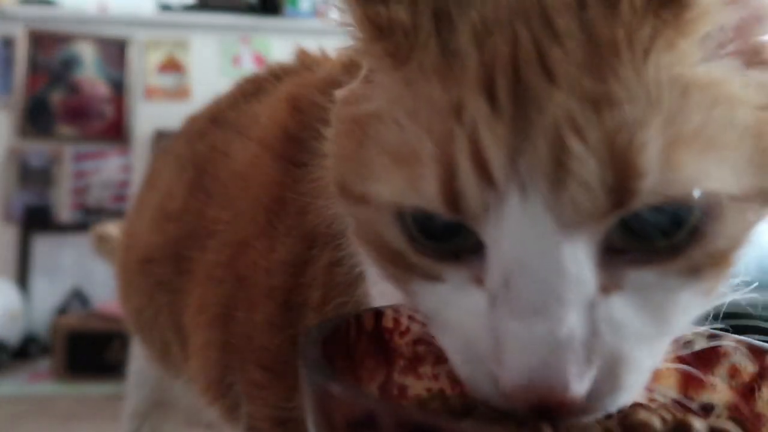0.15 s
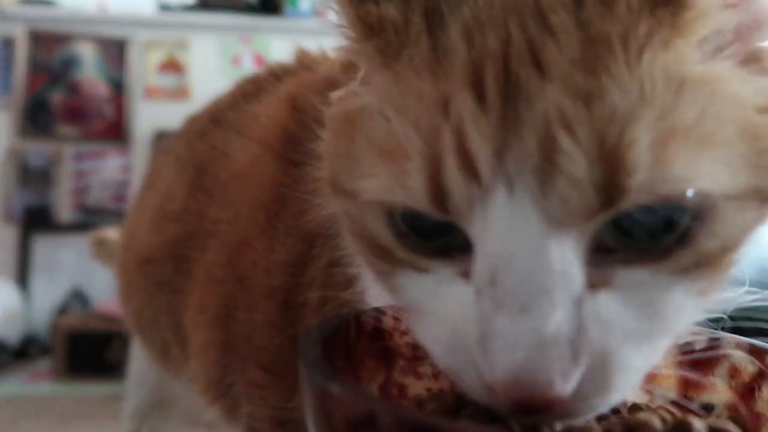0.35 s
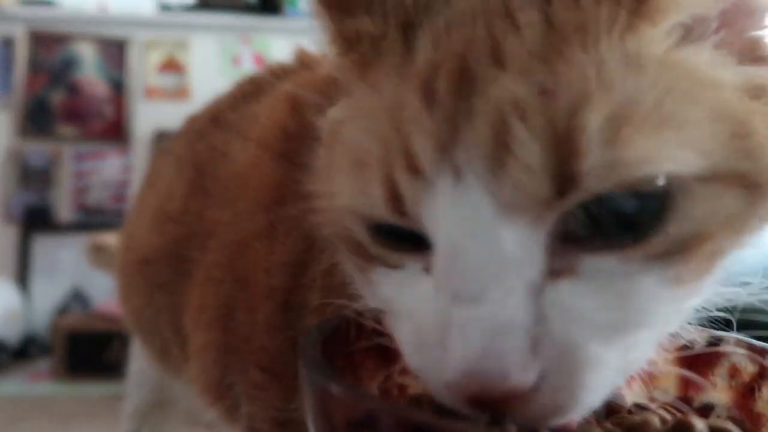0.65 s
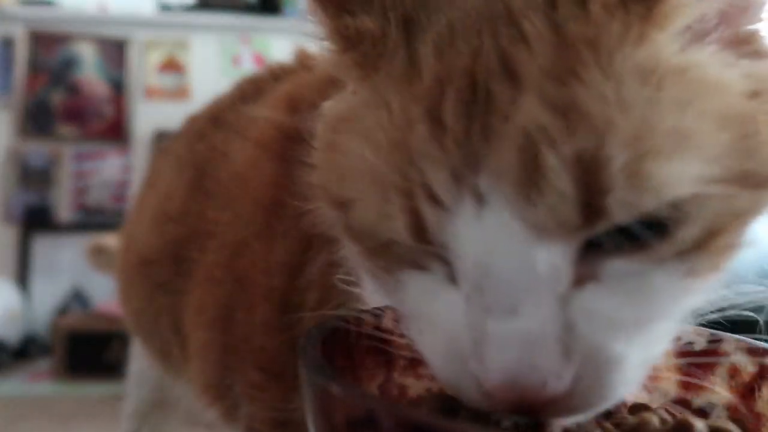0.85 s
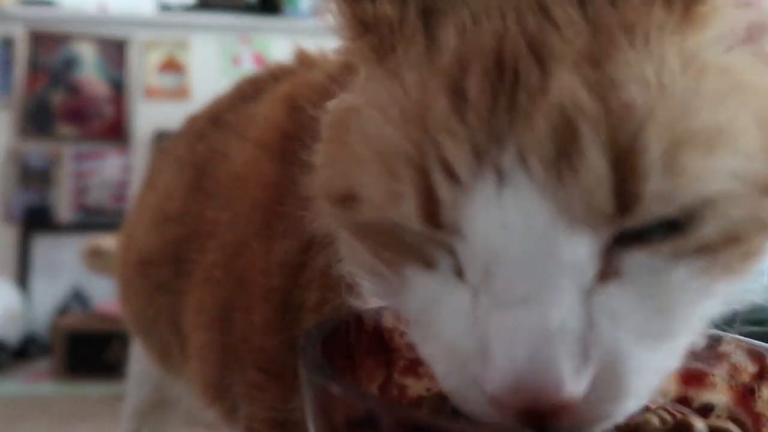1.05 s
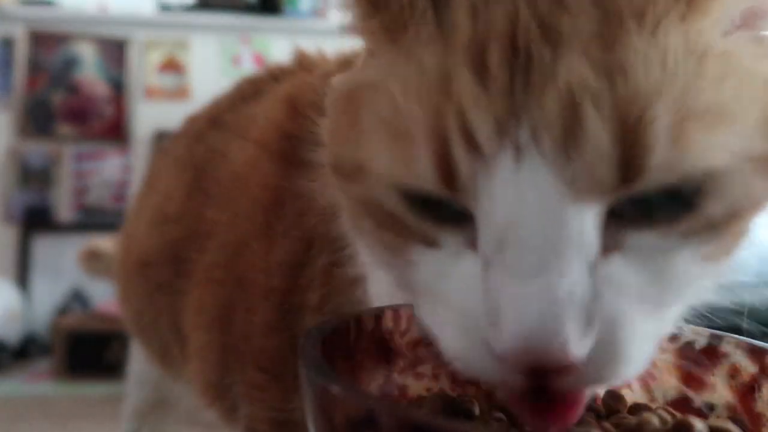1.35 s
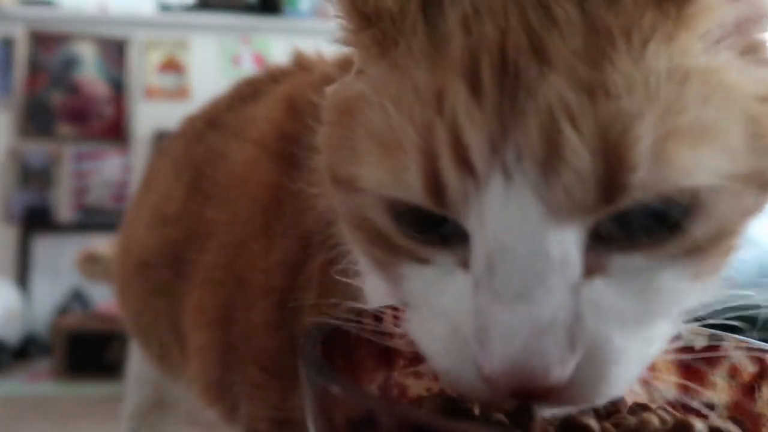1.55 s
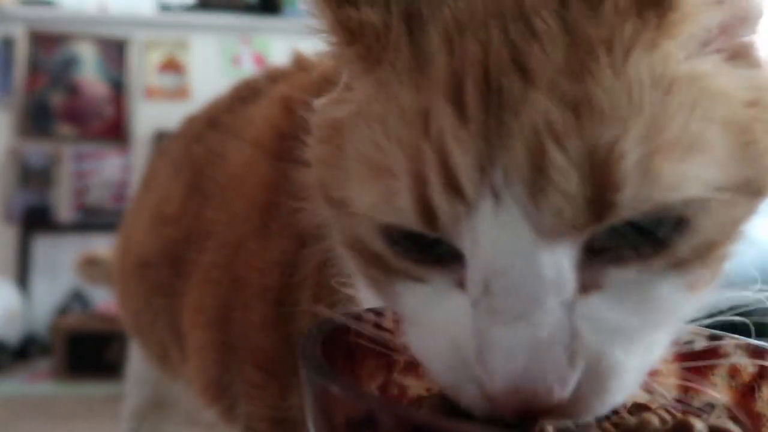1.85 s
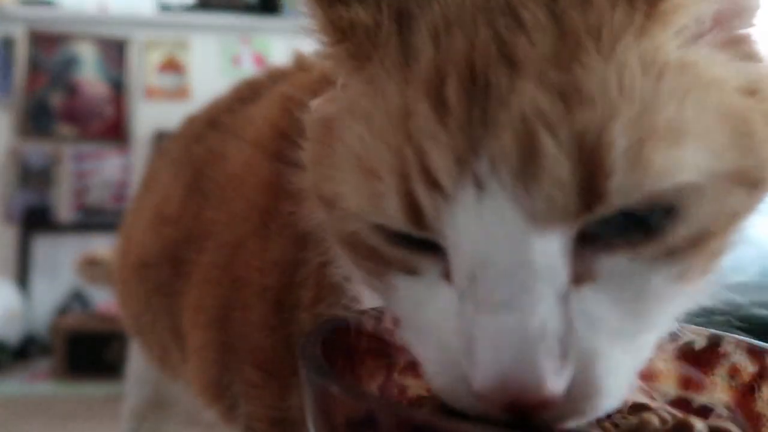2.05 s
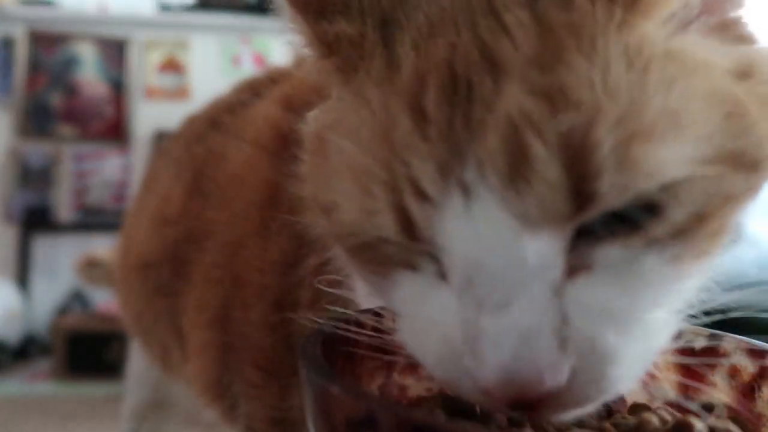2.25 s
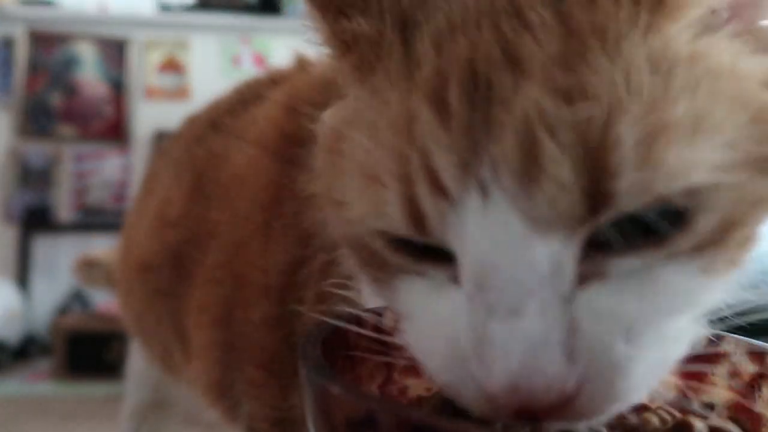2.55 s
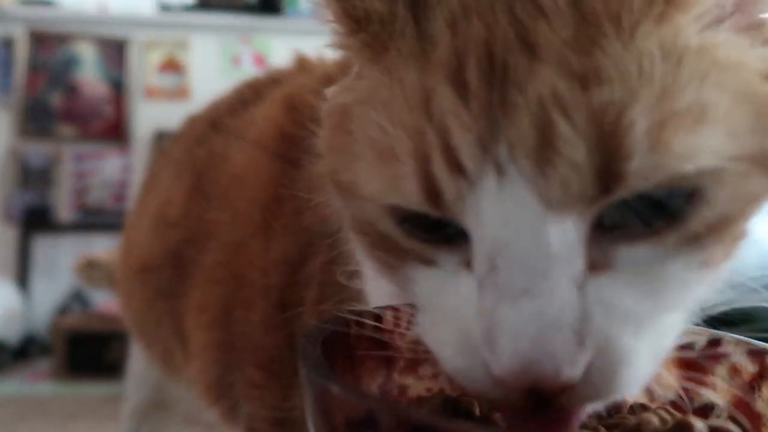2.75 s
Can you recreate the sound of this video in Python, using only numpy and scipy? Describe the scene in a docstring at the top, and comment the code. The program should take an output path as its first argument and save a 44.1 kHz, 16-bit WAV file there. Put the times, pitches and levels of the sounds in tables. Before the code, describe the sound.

A cat crunches dry food a hand's width from two microphones in a quiet furnished room; light nibbles first, then dense loud cracks with crumbling, low dish thuds and two faint wet smacks.

```python
"""Cat crunching dry food

A cat crunches dry food over its dish, a hand's width from two microphones in a quiet furnished room.
Each bite cracks a pellet: a burst of snaps, then a dying shower of tiny fractures, excites short resonances.
Jaw and nose jolt the dish, whose modes thud and rumble; the tongue smacks twice through mouth resonances.
Steady room tone and diffuse reflections surround these sources.
"""
import sys
import numpy as np
from scipy import signal
from scipy.fft import rfft, irfft
from scipy.io import wavfile

SR = 44100
rng = np.random.default_rng(int(sys.argv[2]) if len(sys.argv) > 2 else 0)


def makeup_ratio(level_db):
    """Linear amplitude ratio for a level in decibels (20 dB per factor of ten)."""
    decades = np.asarray(level_db, float) / 20
    return 10 ** decades


def master(y):
    """Save y as 16-bit WAV."""
    cut = np.clip(np.atleast_2d(y).T, -1, 1)
    pcm = np.round(cut * 32767)  # scale
    wavfile.write(sys.argv[1], SR, pcm.astype(np.int16))


N = 127890


def at_hz(points, hz):
    """Spectral interpolation: values between the points are linear in log frequency."""
    table = np.array(points)
    return np.interp(np.log(hz), np.log(table[:, 0] + 1), table[:, 1])


def ring(clicks, hz, t60):
    """Impulse response of a damped oscillator: a unit click starts a dying sine of about unit height."""
    r, w = makeup_ratio(-60 / (t60 * SR)), 2 * np.pi * hz / SR
    return signal.lfilter([0, np.sin(w)], [1, -2 * r * np.cos(w), r * r], clicks + 1e-18)


def dying(s, t60, at):
    """Exponential decay, events x samples `at`: zero before each start, then an even fall in dB."""
    age = at / SR - s[:, None]
    return (age > 0) * makeup_ratio(-60 * np.clip(age, 0, 3) / t60)


def shower(per_s, spread_db):
    """Poisson-like process: clicks at random moments (samples), of random size and sign."""
    chance, size, sign = rng.random(N), rng.exponential(1, N), rng.choice([-1, 1], N)
    at = np.flatnonzero(chance < per_s / SR)
    sizes = makeup_ratio(spread_db * np.minimum(size, 4)) * sign
    return at, sizes[at] / np.sqrt(np.mean(sizes ** 2))


# relative spectral density of the room tone: f/Hz, level/dB
AIR_COLOUR = [(25, -9.5), (148, 1.5), (593, -15), (1980, -21.5), (12000, -37)]
# correlation of left and right in the room tone: f/Hz, correlation/1
AIR_LIKENESS = [(60, 1), (950, 0.51), (15000, -0.16)]
AIR_DB = -46.5   # rms level


def air():
    """Partially coherent noise field: steady room tone, alike in both channels only in the bass."""
    hz = np.arange(N // 2 + 1) * SR / N + 1
    mid, side = rfft(rng.standard_normal((2, N)))
    alike = np.clip(at_hz(AIR_LIKENESS, hz), -1, 1)
    pair = np.sqrt(1 + alike) * mid + np.sqrt(1 - alike) * side * [[1], [-1]]
    out = irfft(makeup_ratio(at_hz(AIR_COLOUR, hz)) * pair, N)
    return makeup_ratio(AIR_DB) * out / out.std()


# pellets crack: t/s, relative level/dB, treble (counted from the median)/dB, crumbling against crack/dB
CRACKS = [(0.054, -37, -42, -4.5), (0.253, -25.5, -22.5, 0), (0.306, -25.5, -37, -4.5),
          (0.444, -23.5, -30, -7.5), (0.522, -23, -40, -0.5), (0.566, -57, 29.5, 2),
          (0.651, -32, -17.5, 5.5), (0.799, -12.5, -24.5, 0), (0.885, -19.5, -22.5, -2),
          (1.01, -32.5, -36, 8.5), (1.033, -22.5, -12, -0.5), (1.053, -20, -30, 3.5), (1.0834, -6, -9, -42),
          (1.0915, -9, -24.5, -2), (1.135, -9.5, -35, -3.5), (1.144, -15, -37, -16), (1.168, -15, -24, 0),
          (1.246, -5.5, -18, -8.5), (1.254, -12, -14.5, -10), (1.343, -11.5, -15.5, -6.5),
          (1.367, -14.5, -18, 2.5), (1.465, -42, -18.5, 18.5), (1.484, -8, -16, -3), (1.502, -23, -17, -5),
          (1.563, -22, -21, -10), (1.576, -10.5, -22.5, -5.5), (1.626, -14, -18, -7),
          (1.75, -17, -14.5, -12), (1.801, -9.5, -25, -9), (1.823, -13, -23, -1.5),
          (1.9274, -4.5, -20, -12.5), (1.9351, -16.5, -28, -26), (2.034, -29.5, -23, 2.5),
          (2.054, -23, -26, 6.5), (2.257, -12.5, -28, -43), (2.322, -25.5, -23, 0.5),
          (2.3837, -18.5, -12.5, -3.5), (2.4187, -11, -14, -1), (2.474, -22.5, -33, 12.5),
          (2.5502, -12.5, -27.5, 1), (2.57, -13, -19, 3), (2.616, -13, -19, -4), (2.675, -18.5, -31, -1),
          (2.703, -18, -30, -29), (2.75, -19.5, -24, -15.5)]
# colour of a fracture, before a rise in proportion to frequency: f/Hz, level/dB
PELLET_COLOUR = [(290, -30), (500, -6), (838, -2.5), (2040, -0.5), (3990, -12), (8710, -23), (14000, -19)]
TREBLE_FROM_HZ = 3160
CRACK_DB, CRACK_SCATTER_DB = -11, 4.5   # scatter over the resonances
CRACK_S = 0.0011   # time constant of the exponential that ends a crack's swell
CRUMBLE_DB, CRUMBLE_T60_S, TREBLE_DIES_FASTER = -10.5, 0.2, 0.27   # T60 at 2 kHz; power of pitch
FRACTURES_PER_S, FRACTURE_SPREAD_DB = 2200, 2.1
FRACTURE_OCTAVES = 0.97   # a fracture rings the resonances this near its own pitch
PATCHY_DB = 3   # each resonance swells and fades as the crumbs change size
SPAN = 600   # samples: longest crack, and the pace at which crumbs change size
RING_CYCLES = 15.65   # cycles in which a resonance falls by 60 dB


def pellets():
    """Brittle fracture: bursts of snaps, then showers of clicks, excite short resonances of many pitches."""
    s, db, treble_db, crumble_db = np.transpose(CRACKS)
    treble_db = treble_db - np.median(treble_db)
    at, sizes = shower(FRACTURES_PER_S, FRACTURE_SPREAD_DB)
    lag = np.arange(SPAN)
    splinters = (rng.random((len(s), SPAN)) < .15) | (lag < 10)
    swell = (lag + 10) * np.exp(-lag / (CRACK_S * SR))
    crack_at = (s * SR).astype(int)[:, None] + lag
    pitches = np.geomspace(450, 12500, 30)
    own_hz = pitches[rng.integers(0, 30, N)]
    scatter, out = rng.standard_normal((len(s), 30)), 0
    for k, hz in enumerate(pitches):
        gain = makeup_ratio(db + treble_db / (1 + (TREBLE_FROM_HZ / hz) ** 4))
        clicks = np.zeros(N + SPAN)

        # crumbling: the powers of all dying showers add
        fade = dying(s, CRUMBLE_T60_S * (2000 / hz) ** TREBLE_DIES_FASTER, at) ** 2
        crumble = np.sqrt((gain * makeup_ratio(crumble_db)) ** 2 @ fade)
        nearness = np.exp(-(np.log2(hz / own_hz) / FRACTURE_OCTAVES) ** 2)
        strength = rng.standard_normal(N) * nearness
        patches = rng.standard_normal(N // SPAN + 2)
        patches_db = PATCHY_DB * np.interp(at / SPAN, np.arange(N // SPAN + 2), patches)
        clicks[at] = makeup_ratio(CRUMBLE_DB + patches_db) * sizes * strength[at] * crumble

        # cracks: each burst has unit energy before its gain
        burst = rng.standard_normal((len(s), SPAN)) * splinters * swell
        burst /= np.sqrt(np.sum(burst ** 2, axis=1, keepdims=True))
        burst *= (gain * makeup_ratio(CRACK_DB + CRACK_SCATTER_DB * scatter[:, k]))[:, None]
        np.add.at(clicks, crack_at, burst)

        push = signal.lfilter(*signal.iirpeak(hz, 2, SR), clicks[:N] + 1e-18)
        out = out + makeup_ratio(at_hz(PELLET_COLOUR, hz)) * hz / 2000 * ring(push, hz, RING_CYCLES / hz)
    return out


# the dish is jolted: t/s, relative level/dB, favoured pitch f/Hz
JOLTS = [(0.097, -23.5, 138), (0.255, -22.5, 368), (0.301, -10.5, 159), (0.442, -13, 142),
         (0.657, -13, 500), (0.798, -15, 189), (0.915, -14.5, 160), (1.029, -18, 365), (1.054, -8.5, 147),
         (1.136, -12.5, 320), (1.267, -15.5, 322), (1.346, -15, 310), (1.379, -14.5, 244),
         (1.482, -9.5, 355), (1.571, -14, 234), (1.741, -22, 186), (1.798, -6, 143), (1.914, -12, 156),
         (2.036, -13, 239), (2.144, -17, 181), (2.328, -18.5, 203), (2.418, -4.5, 310), (2.505, -9.5, 187),
         (2.569, -11.5, 274), (2.687, -20, 290)]
# modes of the dish and the floor under it: f/Hz, level/dB
DISH_MODES = [(135, -10.5), (175, -7), (208, -6), (250, -6), (307, -2.5), (360, 2), (440, -7.5),
              (520, -2.5), (732, -5), (1000, -15)]
JOLT_DB, JOLT_SOFT_S = -9, 0.00024   # time constant of the contact
SHAKE_DB, SHAKES_PER_S, SHAKE_T60_S = -12, 700, 0.26
FAVOUR_OCTAVES, FAVOUR_DB = 0.44, 9.5   # modes far from the favoured pitch lose up to this much
DISH_CYCLES = 9.5   # cycles in which a mode falls by 60 dB
BITE_ON_DISH_DB, DISH_LOW_HZ = -34, 96


def dish(crunch):
    """Modal excitation: soft jolts and dying knocks drive the dish's modes, as do the mouth's own sounds."""
    s, db, pitch_hz = np.transpose(JOLTS)
    at, sizes = shower(SHAKES_PER_S, 1.8)
    fade, out = dying(s, SHAKE_T60_S, at) ** 2, 0
    soft = np.exp(-1 / (JOLT_SOFT_S * SR))
    for hz, level_db in DISH_MODES:
        distance = np.log2(hz / pitch_hz) / FAVOUR_OCTAVES
        gain = makeup_ratio(db - FAVOUR_DB * np.tanh(distance ** 2))
        clicks, strength = np.zeros(N), rng.standard_normal(N)
        clicks[at] = makeup_ratio(SHAKE_DB) * sizes * strength[at] * np.sqrt(gain ** 2 @ fade)
        clicks[(s * SR).astype(int)] += makeup_ratio(JOLT_DB) * gain
        push = signal.lfilter([(1 - soft) ** 2], [1, -2 * soft, soft ** 2], clicks + 1e-18)
        push = push + makeup_ratio(BITE_ON_DISH_DB) * crunch
        out = out + makeup_ratio(level_db) * ring(push, hz, DISH_CYCLES / hz)
    return signal.sosfilt(signal.butter(4, DISH_LOW_HZ, "high", fs=SR, output="sos"), out)


ROOM_DB, ROOM_T60_S = -10, 0.3
ROOM_LOW_HZ, WALL_CUT_HZ = 297, 8100   # band of the reflections
ROOM_WIDE_HZ, WIDE_DB = 3120, -5   # the channels differ above this frequency


def room(x):
    """Diffuse reverberation: dying reflections, shared by the close microphones in the bass, unlike in the treble."""
    age = np.arange(SR // 2) / SR
    mid, side = rng.standard_normal((2, SR // 2)) * makeup_ratio(-60 * age / ROOM_T60_S)
    wide = signal.butter(2, ROOM_WIDE_HZ, "high", fs=SR, output="sos")
    side = makeup_ratio(WIDE_DB) * signal.sosfilt(wide, side)
    band = signal.butter(1, [ROOM_LOW_HZ, WALL_CUT_HZ], "band", fs=SR, output="sos")
    tail = signal.sosfilt(band, [mid + side, mid - side])
    tail = tail / np.sqrt(np.sum(tail ** 2) / 2)
    return makeup_ratio(ROOM_DB) * signal.fftconvolve(x[None], tail, axes=1)[:, :N]


# the tongue smacks wetly: t/s, length/s, level/dB, mouth resonance f/Hz, upper resonance level/dB
SMACKS = [(0.565, 0.038, -33, 920, -5.5), (2.146, 0.031, -34.5, 1130, -20)]
UPPER_RATIO, MOUTH_WIDTH_HZ = 2.55, 130   # upper over lower resonance; bandwidth of each
SMACK_FALL_DB, PEEL_SIZE = 1.5, 5   # fall over the length; first click against a typical later one


def tongue():
    """Source and filter: a strong click, then fading sticky ones, excite two mouth resonances."""
    out = np.zeros(N)
    count = SR // 8
    age = np.arange(count) / SR
    t60 = np.log(1000) / (np.pi * MOUTH_WIDTH_HZ)
    for s, length, db, hz, upper_db in SMACKS:
        sticky = rng.standard_normal(count) * (rng.random(count) < .05)
        sticky *= (age < length) * makeup_ratio(-SMACK_FALL_DB * age / length)
        sticky[0] = PEEL_SIZE
        sound = np.zeros(count)
        for f, gain in ((hz, 1), (UPPER_RATIO * hz, makeup_ratio(upper_db))):
            push = signal.lfilter(*signal.iirpeak(f, 2, SR), sticky)
            sound += gain * ring(push, f, t60)
        out[int(s * SR):][:count] += makeup_ratio(db) * sound / np.sqrt(np.sum(sound ** 2) / (length * SR))
    return out


LEFT_LEADS_S, LEFT_LOUDER_DB, DISH_LEFT_DB = 4.6e-5, 1.65, .4   # left against right


def scene():
    """Interaural-style level and time differences: the mouth is a little nearer the left microphone."""
    crunch = pellets() + tongue()
    thud = dish(crunch)
    halves = np.array([[.5], [-.5]])
    near = crunch * makeup_ratio(halves * LEFT_LOUDER_DB) + thud * makeup_ratio(halves * DISH_LEFT_DB)
    hz = np.arange(N // 2 + 1) * SR / N
    # a phase slope delays the right channel by a fraction of a millisecond
    near[1] = irfft(rfft(near[1]) * np.exp(-2j * np.pi * hz * LEFT_LEADS_S), N)
    return near + room(crunch + thud) + air()


def band_limit(x):
    """A steep low-pass at the top of the band."""
    return signal.sosfilt(signal.butter(12, 15810, fs=SR, output="sos"), x)


def record(dry):
    """Low-pass response: the microphones roll off steeply above 10.6 kHz."""
    mix = signal.sosfilt(signal.butter(3, 10600, fs=SR, output="sos"), dry)
    return band_limit(mix)


dry = scene()
out = record(dry)
master(out)
```